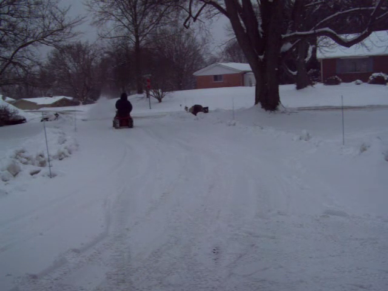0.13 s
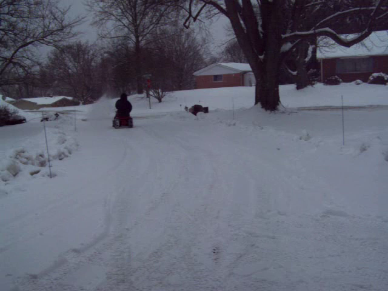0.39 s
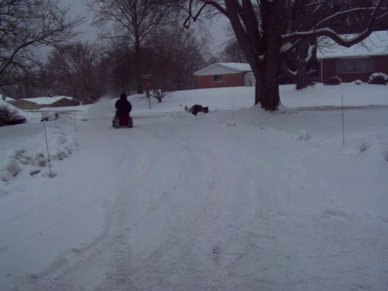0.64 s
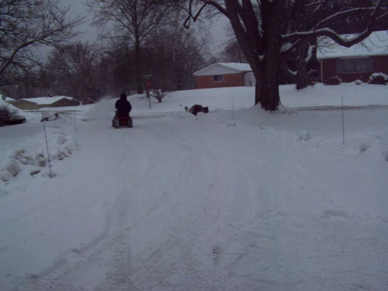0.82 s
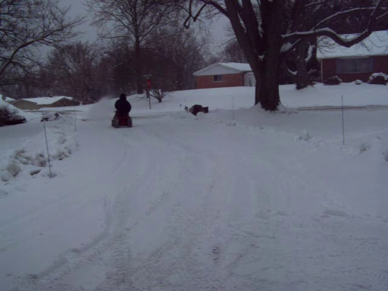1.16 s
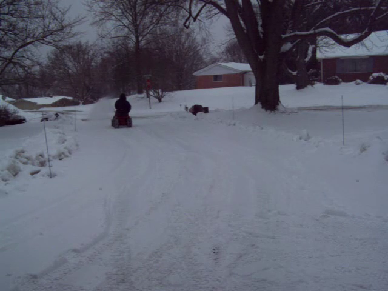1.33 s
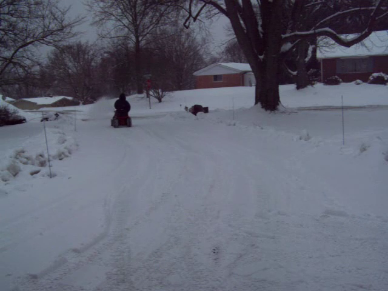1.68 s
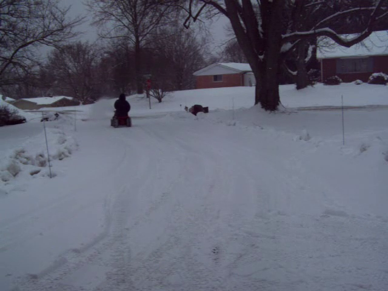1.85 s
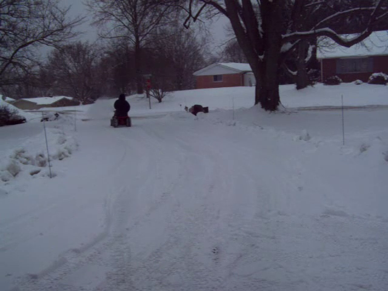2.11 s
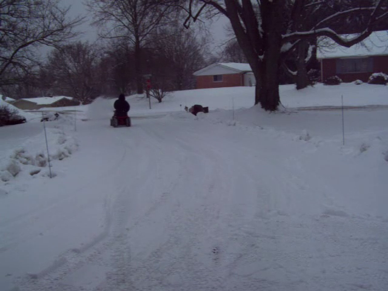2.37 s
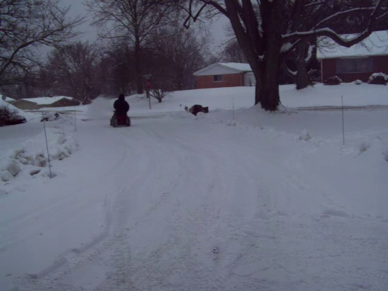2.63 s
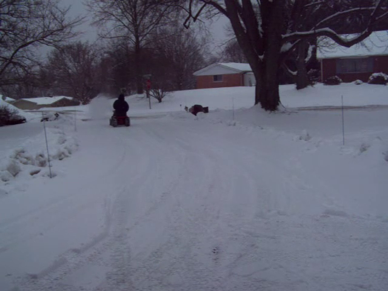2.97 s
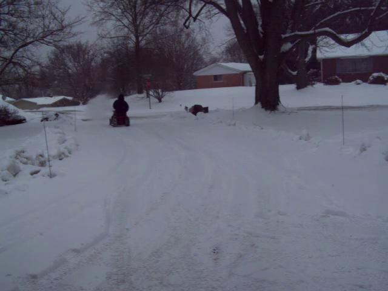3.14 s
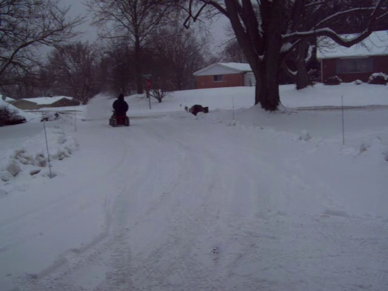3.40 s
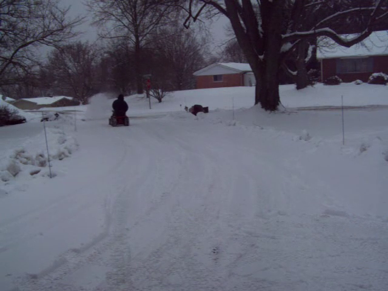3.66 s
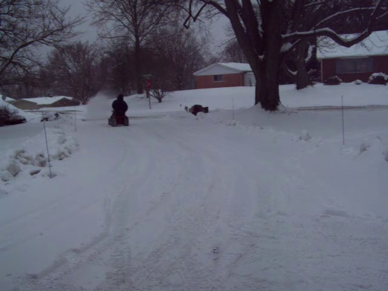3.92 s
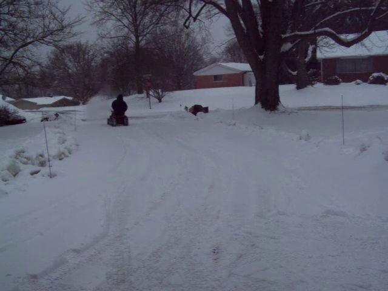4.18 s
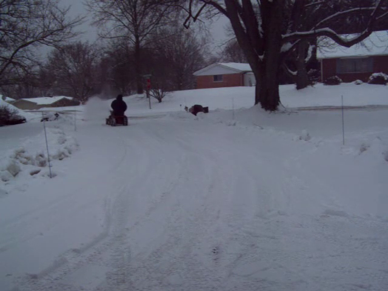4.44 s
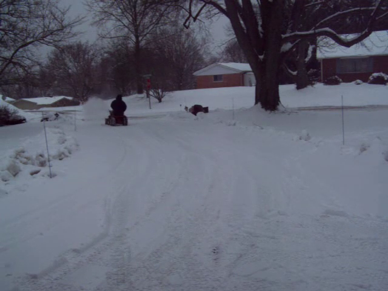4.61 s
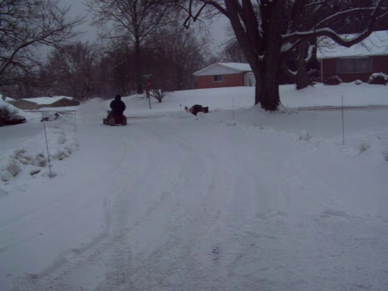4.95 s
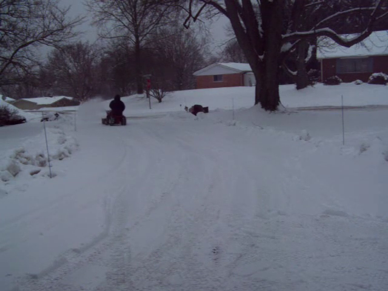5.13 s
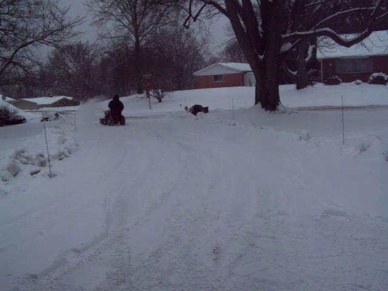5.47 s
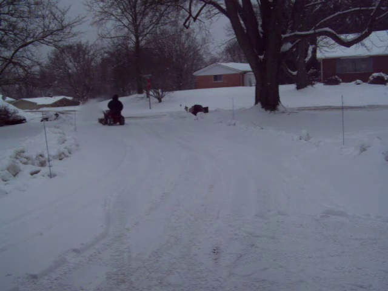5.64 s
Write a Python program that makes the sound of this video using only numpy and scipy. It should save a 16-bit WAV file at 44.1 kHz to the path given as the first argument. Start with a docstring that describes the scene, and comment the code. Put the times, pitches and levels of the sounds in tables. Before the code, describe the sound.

A small single-cylinder tractor engine thumps steadily under load with metallic clatter from its snowthrower, outdoors, dry and close-sounding.

```python
"""A garden tractor with a snowthrower works at the far end of a snowy driveway, heard without echoes.
Its single-cylinder four-stroke engine thumps through the muffler once every two turns of the crank: a
sum of harmonics locked to the crank, with pulsing noise for the gas. A sine hums for the impeller.
Noise, ticks and ringing parts clatter through the sheet-metal housing, with hard clacks and fine bright
ticks. Low filtered noise makes the rumble, the dying breeze and the puffs of air on the microphone."""
import sys
import numpy as np
from scipy import signal
from scipy.fft import rfft, irfft
from scipy.io import wavfile

SR = 44100
rng = np.random.default_rng(int(sys.argv[2]) if len(sys.argv) > 2 else 0)


def transcribe(u):
    """Save the signal u as a 16-bit wav file named by the first command-line argument.

    u: samples, shape (n,) or (channels, n), limited to [-1, 1]; the rate is SR.
    q: integer samples, one column per channel.
    """
    v = np.clip(np.atleast_2d(u).T, -1, 1)
    q = np.round(v * 32767).astype(np.int16)
    wavfile.write(sys.argv[1], SR, q)


N = 255339
TIME = np.arange(N) / SR  # s
HZ = np.fft.rfftfreq(N, 1 / SR)

# governed engine speed: time_s, speed_rpm
ENGINE_SPEED = [(0.0, 2685.2), (0.25, 2696.1), (1.11, 2716.2), (2.08, 2714.1), (2.44, 2686.0),
                (2.89, 2741.1), (3.42, 2743.5), (4.32, 2666.5), (5.61, 2673.3), (5.79, 2653.5)]


def crank(start=.0455):
    """Engine cycles counted so far, two turns each; no two take quite the same time."""
    unevenness = .0015 * drift(12)
    cycles_per_s = curve(ENGINE_SPEED) / (2 * 60)
    return start + np.cumsum(cycles_per_s) / SR + unevenness


# muffler and tailpipe, relative: firing_rate_multiple, level_db
MUFFLER_COLOUR = [(1, -40), (2, -31.5), (3, -31.5), (4, -7.5), (5, -8.5), (6, 1.5), (7, -1.5), (8, -1),
                  (9, -10.5), (10, -8), (11, -7), (12, -35), (13, -18.5), (14, -24), (15, -17.5), (16, -29),
                  (17, -12.5), (18, -10.5), (19, -37), (20, -31.5), (21, -12.5), (22, -34)]
# level laws of thump and bark: cruise_db, creeping_away_db_per_s, db_per_percent_extra_speed, turned_db
THUMP_LAW = (-19, -0.3, 0.13, 0.15)
BARK_LAW = (-30.5, -0.09, 1.4, -3.5)


def exhaust(cycle, ring=0.37, bark_db=10.0):
    """One short pressure pulse a cycle leaves the muffler (thump) and the tailpipe (bark)."""
    multiple, db = np.transpose(MUFFLER_COLOUR)
    size = 128
    db = np.interp(np.arange(size // 2 + 1), np.r_[0, multiple, 2 * len(db)], np.r_[-45, db, -45])
    # the well-damped muffler keeps the pulse compact: only a share of its colour rings on
    response = -causal(ring * db, size) * gain_of((1 - ring) * db)
    brightness_db = pipe_db(BARK_LAW) - pipe_db(THUMP_LAW) + bark_db
    out = np.zeros(N)
    for k in range(1, len(multiple) + 1):
        # the pipe beams its short waves; they also fade and shift most as the tractor creeps on
        beamed = np.clip((k - 8) / 9, 0, 1)
        fading_db = .06 * k * drift(1)
        shift = .5 * beamed * drift(1)
        wave = np.exp(1j * (2 * np.pi * k * cycle + shift))
        out += gain_of(beamed * brightness_db + fading_db) * (response[k] * wave).real
    firing_db = .45 * drift(12)
    return evened(out) * gain_of(pipe_db(THUMP_LAW) + firing_db)


# gas rushing out with each stroke, relative: frequency_hz, density_db
GAS_COLOUR = [(30, -27), (70, -6), (140, -5.5), (200, 10), (270, 3), (400, 4), (520, -5), (700, 0),
              (1000, -38)]
# gas level law before its trim: cruise_db, creeping_away_db_per_s, db_per_percent_extra_speed, turned_db
FLOW_LAW = (-24.5, -.2, -0.9, -2.5)


def gas(cycle, trim_db=-6.5, fade_cycles=0.64, steady=3.8, lead_cycles=0.025):
    """Turbulence in the pipe, strongest just after the exhaust valve opens."""
    gate = steady + np.exp(-((cycle + lead_cycles) % 1) / fade_cycles)
    turbulence = coloured(gate * rng.standard_normal(N), spectrum_db(GAS_COLOUR))
    return turbulence * gain_of(pipe_db(FLOW_LAW) + trim_db)


# impeller level law: cruise_db, creeping_away_db_per_s, db_per_percent_extra_speed, turned_db
BLADE_HUM_LAW = (-35.5, -0.6, -0.5, -4)


def impeller(cycle, waver_db=2):
    """The belt-driven impeller hums at its blade rate, slipping a little against the crank."""
    blades = 13.33 * cycle + .22 * drift(4)
    hum = np.sin(2 * np.pi * blades) * gain_of(waver_db * drift(4.5))
    return evened(hum) * gain_of(flank_db(BLADE_HUM_LAW))


# clatter level law before its trim: cruise_db, creeping_away_db_per_s, db_per_percent_extra_speed, turned_db
CLATTER_LAW = (-19.4, 0.02, 0.06, 0.5)
# bursts of clatter in each engine cycle, before their growth: place_in_cycle (0-1), width_cycles, level_db
STROKE_BURSTS = [(1, 0.021, 1.5), (0.19, 0.073, -2.5), (0.2, 0.03, 1.9)]


def clatter(cycle, trim_db=0.56, ticks_per_s=1100, spread_db=3, tick_share=0.24, flutter_db=0.66,
            growth_per_s=0.15, treble_hz=2200):
    """Dense metal ticks, the hiss of snow, ringing parts and the repeating rattle sound through the housing."""
    hits = (rng.random(N) < ticks_per_s / SR) * rng.choice([-1, 1], N)
    ticks = hits * gain_of(spread_db * np.minimum(rng.exponential(1, N), 4))
    hiss = rng.standard_normal(N)
    loose = np.sqrt(tick_share) * evened(ticks) + np.sqrt(1 - tick_share) * hiss
    # low knocks repeat from cycle to cycle, high ones scatter
    locked = .8 / (1 + (HZ / 2000) ** 2)
    drive = irfft(np.sqrt(locked) * rfft(rattle(cycle)) + np.sqrt(1 - locked) * rfft(loose), N)
    drive += gain_of(-12.5) * pings()
    stroke_db = np.zeros(N)
    for place, width, db in STROKE_BURSTS:
        from_burst = (cycle - place + .5) % 1 - .5
        stroke_db += db * np.exp(-.5 * (from_burst / width) ** 2)
    # the beat stands out steadily more with time
    stroke_db *= 1 + growth_per_s * (TIME - TIME.mean())
    # the bursts are mostly treble
    treble = irfft(rfft(drive) * HZ ** 2 / (HZ ** 2 + treble_hz ** 2), N)
    drive = drive - treble + treble * gain_of(stroke_db + flutter_db * drift(60))
    return coloured(drive, housing_db()) * gain_of(flank_db(CLATTER_LAW) + trim_db)


def rattle(cycle, change_s=1.2):
    """Gears and valve train repeat the same run of knocks each cycle; one run slowly gives way to the next."""
    firings = np.diff(np.floor(cycle), prepend=0)
    out = np.zeros(N)
    for centre in np.arange(0, TIME[-1] + change_s, change_s):
        weight = np.cos(np.pi / 2 * np.clip((TIME - centre) / change_s, -1, 1))
        knocks = rng.standard_normal(SR // 22)
        out += signal.oaconvolve(firings * weight, knocks)[:N]
    return evened(out)


def pings(count=70, per_s=45, t60=0.073):
    """Small loose parts, each knocked at random and ringing briefly at its own pitch."""
    out, t = np.zeros(N), np.arange(SR // 12) / SR
    for hz in np.geomspace(1000, 5200, count) * (1 + .015 * rng.standard_normal(count)):
        knocks = (rng.random(N) < per_s / SR) * rng.random(N)
        ringing = gain_of(-60 * t / t60) * np.sin(2 * np.pi * hz * t)
        out += signal.oaconvolve(knocks, ringing)[:N] * np.sqrt(hz)
    return evened(out)


# broad colour of the housing, relative: frequency_hz, density_db
HOUSING_COLOUR = [(200, -29.5), (500, -13.5), (800, -17), (1050, -12), (1600, -12.5), (2400, -11.5),
                  (3300, -7.5), (3900, -1), (4600, -10.5), (5300, -16), (6500, -22.5), (7400, -29.5),
                  (8200, -39), (8900, -58)]
# ringing panels, above the broad colour: frequency_hz, width_hz, level_db
RINGING_PANELS = [(1210, 53, 3.5), (1990, 63, 5.5), (2760, 150, 4), (4010, 1000, 1.5), (4730, 150, 1.5),
                  (6120, 200, 2), (7300, 190, 2)]


def housing_db():
    """Colour of the sheet-metal housing with its ringing panels."""
    panels_db = sum(db / (1 + (2 * (HZ - hz) / width) ** 2) for hz, width, db in RINGING_PANELS)
    return spectrum_db(HOUSING_COLOUR) + panels_db


# the hardest clacks of the auger drive, levels before colour and trim: time_s, level_db
HARD_CLACKS = [(2.721, -18), (3.14, -11), (5.14, -16), (5.188, -17), (5.682, -4.5)]
SOFT_CLACKS_PER_S, SOFT_CLACK_DB = 1.6, -23  # level before colour and trim


def clacks(trim_db=9, t60=0.031, bright_db_per_octave=5):
    """Single hard knocks, brighter than the clatter around them; softer ones fall at random."""
    out, t = np.zeros(N), np.arange(SR // 20) / SR
    soft = [(s, SOFT_CLACK_DB) for s in TIME[rng.random(N) < SOFT_CLACKS_PER_S / SR]]
    for s, db in list(HARD_CLACKS) + soft:
        add(out, s - .001, gain_of(db - 60 * t / t60) * rng.standard_normal(len(t)))
    colour_db = housing_db() + bright_db_per_octave * np.log2((HZ + 100) / 4000)
    return gain_of(trim_db) * irfft(rfft(out) * causal(colour_db, N), N)


def bright_ticks(per_s=90, level_db=-49, t60=0.016):
    """Fine bright ticks at random, each a fast-fading burst of high noise."""
    hits = (rng.random(N) < per_s / SR) * gain_of(3.3 * np.minimum(rng.exponential(1, N), 3))
    envelope = signal.lfilter([1], [1, -gain_of(-60 / (t60 * SR))], hits)
    colour_db = spectrum_db([(2000, -29.5), (5000, -7.0), (7000, 8.0), (8200, -3), (8900, -27)])
    return gain_of(level_db) * coloured(envelope * rng.standard_normal(N), colour_db)


# the strongest puffs on the microphone, levels before halving: middle_s, level_db, pitch_hz
AIR_PUFFS = [(1.264, -40, 38), (1.437, -29, 72), (2.046, -41, 46), (3.01, -45, 45), (3.325, -44, 42),
             (5.15, -42.5, 45)]
PUFF_HALF_LENGTH_S = 0.12
BREEZE_DB, BREEZE_DB_PER_S, BREEZE_GUST_DB = -48.5, -5.5, 5


def air(rumble_db=-60):
    """A faint outdoor rumble, a dying breeze and brief low puffs on the microphone."""
    breeze = gain_of(BREEZE_DB + BREEZE_DB_PER_S * TIME + BREEZE_GUST_DB * drift(6))
    colour_db = spectrum_db([(5, -18.0), (22, -2.0), (60, -3.0), (200, -24.5), (1000, -64.0)])
    out = (gain_of(rumble_db) + breeze) * coloured(rng.standard_normal(N), colour_db)
    size = round(2 * PUFF_HALF_LENGTH_S * SR)
    for s, db, hz in AIR_PUFFS:
        band = signal.butter(2, [hz * .75, hz * 1.2], "bandpass", fs=SR, output="sos")
        eddy = signal.sosfilt(band, rng.standard_normal(SR))[-size:]
        puff = evened(eddy * np.hanning(size) ** 2)
        add(out, s - PUFF_HALF_LENGTH_S, .5 * gain_of(db) * puff)
    return out


CRUISE_RPM = 2700


def loudness_db(law, turn_s, turn_length_s):
    """Level of one part of the tractor from its distance, engine speed and heading."""
    cruise_db, db_per_s, db_per_percent, turned_db = law
    extra_percent = 100 * (curve(ENGINE_SPEED) / CRUISE_RPM - 1)
    turned = .5 + .5 * np.sin(np.pi * np.clip((TIME - turn_s) / turn_length_s, -.5, .5))
    return cruise_db + db_per_s * TIME + db_per_percent * extra_percent + turned_db * turned


# the tractor creeps away, then swings round; each turn is timed by its middle
def pipe_db(law):
    """Level of the exhaust's thump, bark or gas flow as the tailpipe turns aside."""
    return loudness_db(law, turn_s=4.7, turn_length_s=.8)


def flank_db(law):
    """Level of the clatter or impeller as the engine's flank comes into view."""
    return loudness_db(law, turn_s=4.6, turn_length_s=.8)


def gain_of(db):
    """Decibels to amplitude."""
    return 10 ** (np.asarray(db) / 20)


def evened(x):
    """Scales to rms 1."""
    return x / np.sqrt(np.mean(x ** 2) + 1e-20)


def curve(rows):
    """A time table at every sample."""
    return np.interp(TIME, *np.transpose(rows))


def spectrum_db(points):
    """Joins (Hz, dB) points on a log-frequency axis."""
    hz, db = np.transpose(points)
    return np.interp(np.log(HZ + 1), np.log(hz), db)


def causal(db, size):
    """Complex (minimum-phase) response with these gains that rings only after it is struck."""
    cepstrum = irfft(np.log(gain_of(db)), size)
    cepstrum[1:(size + 1) // 2] *= 2
    cepstrum[size // 2 + 1:] = 0
    return np.exp(rfft(cepstrum))


def coloured(x, db):
    """Passes x through a body with these gains; rms 1."""
    return evened(irfft(rfft(x) * causal(db, N), N))


def drift(rate_hz):
    """Slow random wander of rms 1."""
    return evened(irfft(rfft(rng.standard_normal(N)) * np.exp(-(HZ / rate_hz) ** 2), N))


def add(mix, s, sound):
    """Mixes a sound in from time s."""
    start = round(s * SR)
    sound = sound[max(-start, 0):]
    part = mix[max(start, 0):][:len(sound)]
    part += sound[:len(part)]


def scene():
    """Exhaust, gas, impeller and clatter follow the crank; clacks, fine ticks and air keep their own time."""
    cycle = crank()
    engine = exhaust(cycle) + gas(cycle)
    snowthrower = impeller(cycle) + clatter(cycle) + clacks()
    return (engine + snowthrower + bright_ticks() + air())[None]


def record(dry):
    """The microphone's narrow sound band: a steep low-pass."""
    edge_hz = 8920
    lowpass = signal.firwin(701, edge_hz, window=("kaiser", 9), fs=SR)
    return signal.oaconvolve(dry, lowpass[None], "same")


dry = scene()
out = record(dry)
transcribe(out)
```